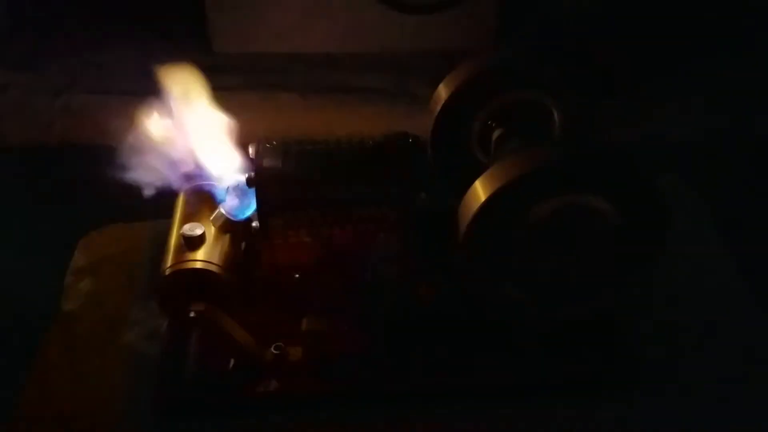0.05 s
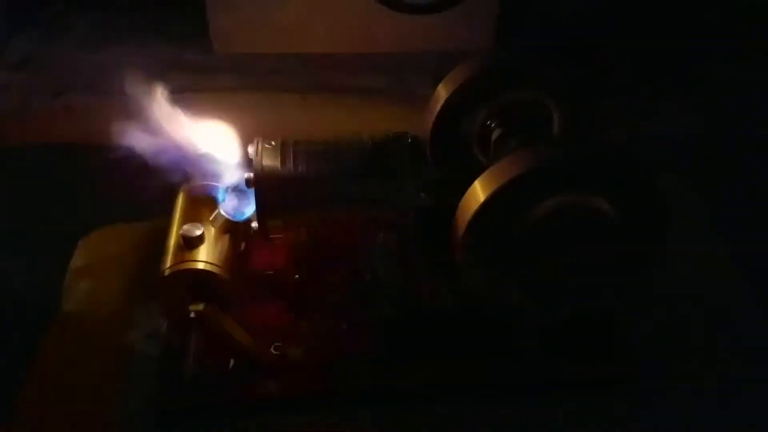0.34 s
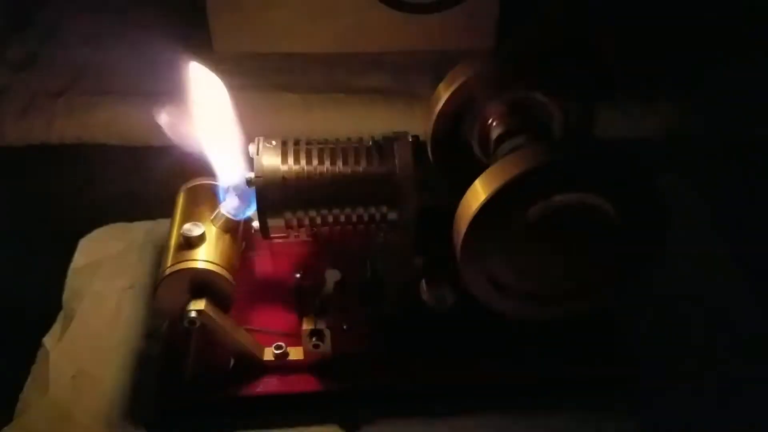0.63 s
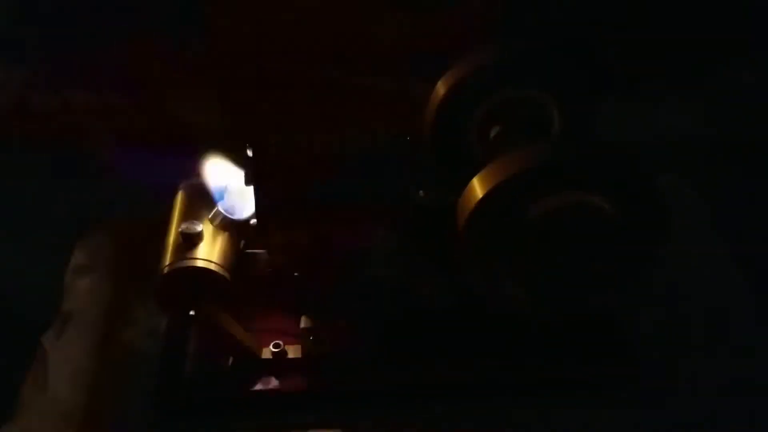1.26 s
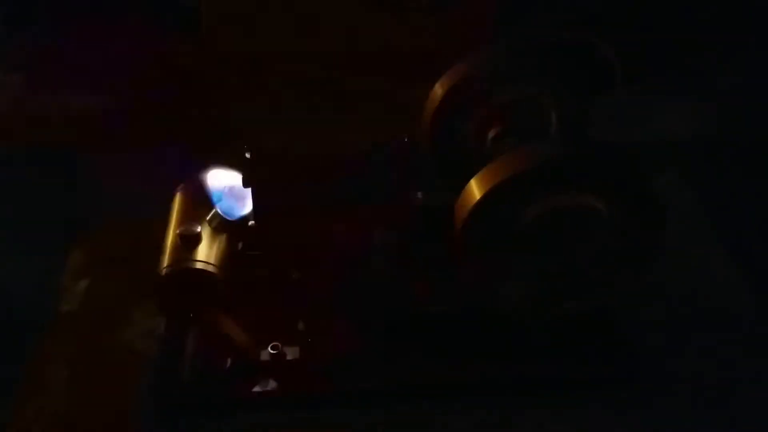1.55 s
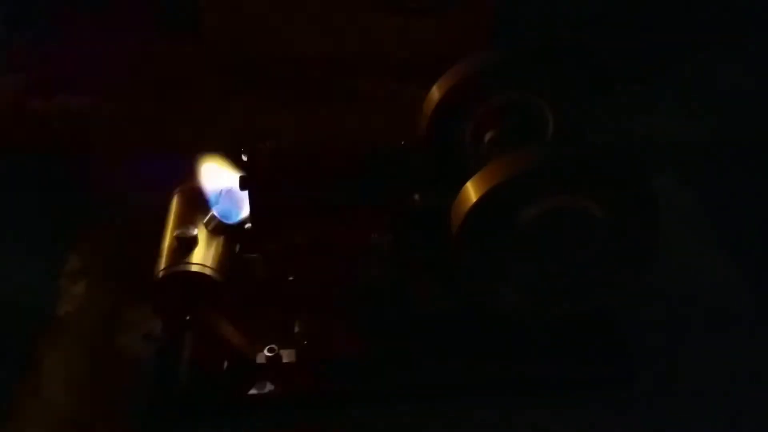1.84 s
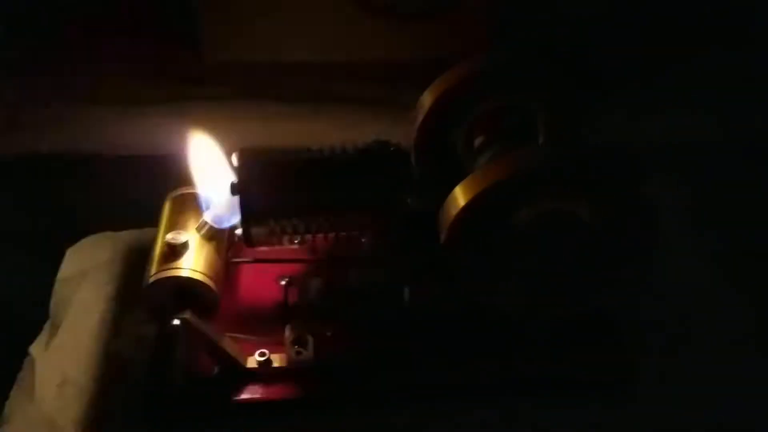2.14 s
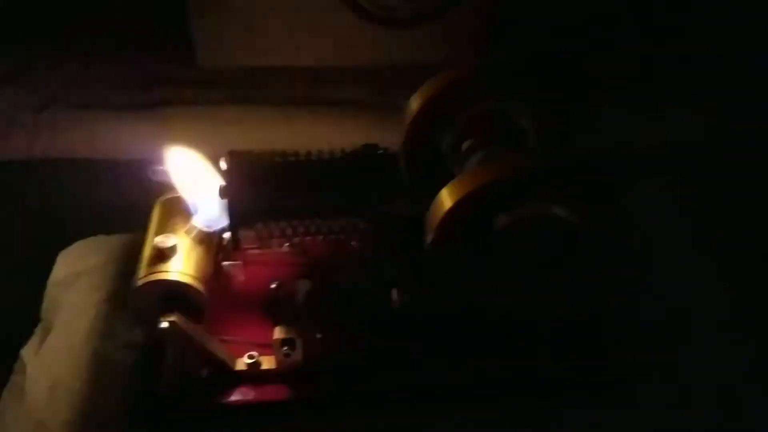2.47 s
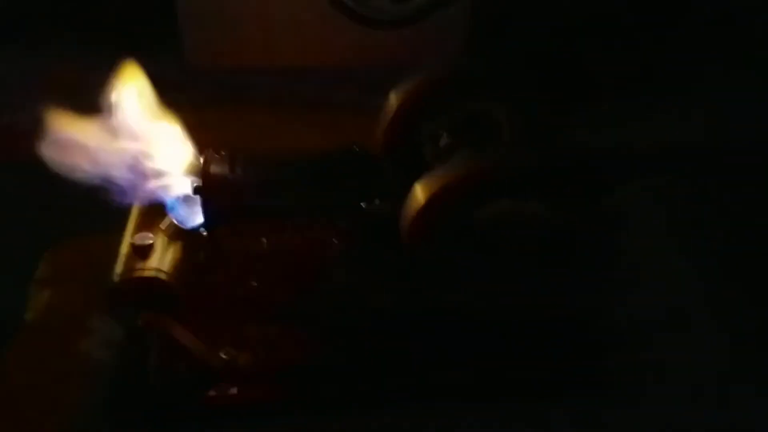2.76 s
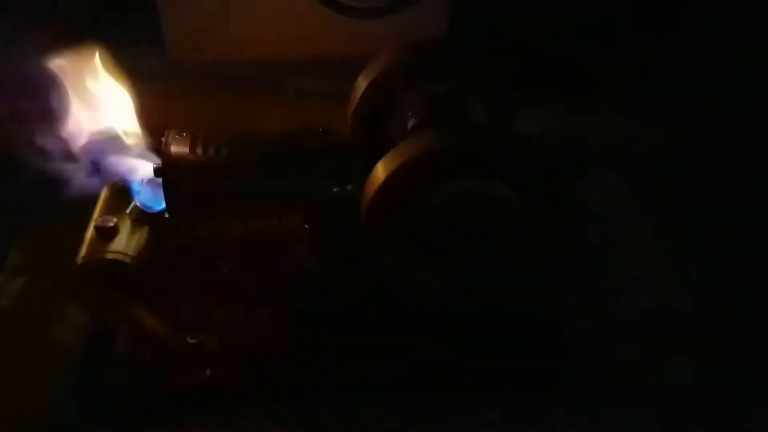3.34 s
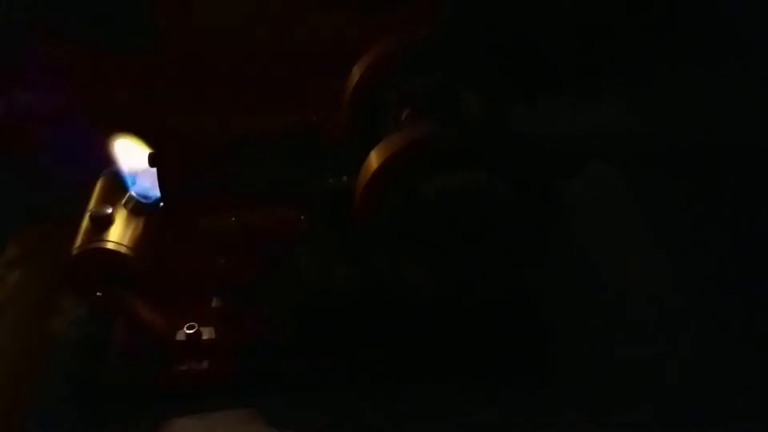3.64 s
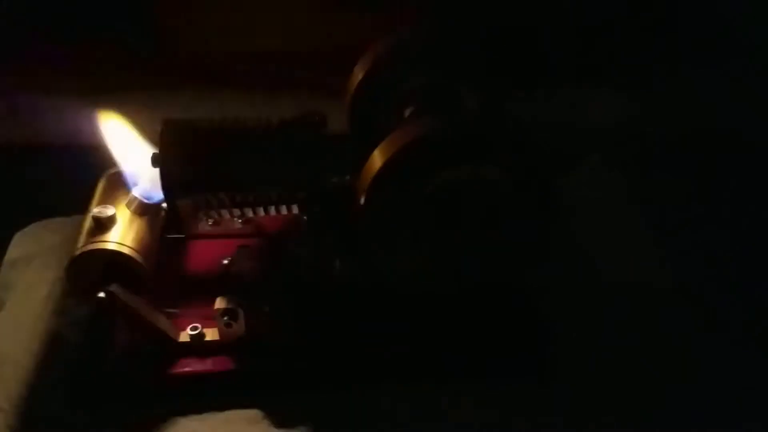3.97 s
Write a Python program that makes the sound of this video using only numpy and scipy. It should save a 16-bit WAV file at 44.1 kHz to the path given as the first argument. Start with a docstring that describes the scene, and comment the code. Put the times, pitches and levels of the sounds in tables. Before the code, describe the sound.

A small model engine runs from the start to about 4 seconds, at nearly four strokes a second. Each stroke is a tick, a pop and a sharp metallic clack with thin, high ringing, followed by a short whistling puff of gas. Tiny squeaks come near 0.4, 1.2, 2.8 and 3.6 seconds. A faint hum and steady noise lie underneath in a small, quiet room.

```python
"""A small flame-licker engine

The engine runs on a table in a quiet room, at nearly four turns a second. On each turn the valve
ticks, a pressure pulse pops from the port and the valve clacks shut, setting brass parts and springs
in free vibration. Gas then hoots in the resonant cylinder (on some turns only) and leaks out in a
whistle that falls with the pressure, while the linkage rubs, ticks and now and then squeaks."""
import sys
import numpy as np
from scipy import signal
from scipy.fft import rfft, irfft
from scipy.io import wavfile
from scipy.ndimage import uniform_filter1d, minimum_filter1d

SR = 44100
rng = np.random.default_rng(int(sys.argv[2]) if len(sys.argv) > 2 else 0)


def output_pcm(signal):
    """Save a mono or channel-first signal as 16-bit PCM at the path in sys.argv[1].

    Samples are clipped to [-1, 1] before scaling.
    """
    pcm = np.clip(np.atleast_2d(signal).T, -1, 1) * 32767
    wavfile.write(sys.argv[1], SR, np.round(pcm).astype(np.int16))


N = 176400
TIME = np.arange(N) / SR

# Working strokes. Each row: start in seconds, then relative levels in dB of the pop, the clatter,
# the brass ring, the spring zing and the valve clank.
STROKES = [(0.0138, -19, -21.5, -33.5, -27.5, -20), (0.2749, -24, -33, -53, -31.5, -57),
           (0.5864, -19, -26, -36.5, -27.5, -27), (0.8442, -19, -23.5, -35.5, -28.5, -18.5),
           (1.11, -18.5, -24.5, -34.5, -29.5, -19.5), (1.4016, -18, -25.0, -37.0, -28, -22.5),
           (1.6578, -20, -21, -33.5, -29.5, -23), (1.9366, -20, -25, -37.5, -33, -21),
           (2.1916, -18.5, -22, -36, -30, -19), (2.4302, -18, -21.5, -46.5, -28, -26),
           (2.6912, -18.5, -23, -40, -25, -28.3), (2.9814, -21.5, -21.5, -37.5, -21, -29.0),
           (3.233, -19, -23.5, -36.5, -27.5, -27), (3.4799, -22, -28, -42, -32.5, -33.5),
           (3.7679, -20, -27, -41, -31.5, -29)]
# Gas leaks. Each row: time of mid-fall in seconds, relative levels in dB of the high and low parts.
WHISTLES = [(0.12, -22, -21.5), (0.39, -21, -27), (0.691, -28.5, -19), (0.954, -22.5, -19),
            (1.223, -25.5, -22.5), (1.513, -23.5, -13.5), (1.773, -37, -17.5), (2.044, -18, -21),
            (2.296, -19.5, -26), (2.541, -23.0, -25), (2.803, -25, -26.5), (3.087, -27.5, -23.5),
            (3.336, -22.5, -15.5), (3.594, -18.5, -39), (3.886, -36, -23.5)]
# Squeaks of dry metal. Each row: time of the peak in seconds, frequency in Hz, level in dB.
SQUEAKS = [(.385, 7740, -30), (.415, 6480, -25), (1.247, 6600, -24.5), (1.796, 6546, -32),
           (2.528, 8441, -29), (2.796, 8010, -25.5), (2.829, 6546, -29), (3.585, 7860, -22)]
# Other brief events. Each row: time of the peak in seconds, relative level in dB.
HOOTS = [(0.076, -24.5), (0.3426, -24.5), (0.908, -24.5), (1.1748, -22.5), (1.7236, -22.5), (2.4931, -20.5),
         (2.7573, -19.5), (3.2936, -20.5), (3.5458, -21)]
RUBS = [(0.149, -35.5), (0.419, -35), (0.72, -36), (0.981, -34), (1.247, -36), (1.536, -37), (1.79, -33.5),
        (2.076, -35.5), (2.321, -33.5), (2.566, -33), (2.826, -35.0), (3.112, -34.5), (3.364, -34.5),
        (3.617, -34), (3.904, -37.7)]
TICKS = [(0.1535, -44), (0.2076, -34.5), (0.2533, -18.5), (0.4156, -33), (0.502, -40), (0.5623, -18),
         (0.7259, -28.5), (0.7786, -32), (0.8231, -23), (0.9849, -40), (1.0403, -33), (1.0869, -19),
         (1.2471, -51), (1.3224, -40.0), (1.3778, -21.5), (1.5405, -25.5), (1.5929, -31), (1.6364, -20.5),
         (1.7948, -28.7), (1.8646, -33), (1.9153, -20.5), (2.0788, -17), (2.1283, -28), (2.1704, -21.5),
         (2.3258, -18.5), (2.3711, -28), (2.4111, -22), (2.5687, -32), (2.6239, -34), (2.6701, -19.5),
         (2.8267, -44), (2.9023, -33), (2.9581, -22), (3.1172, -24), (3.1677, -27.5), (3.2117, -20.5),
         (3.3687, -24), (3.417, -32), (3.4599, -19), (3.6163, -46), (3.6923, -28), (3.7463, -19.5),
         (3.9135, -49), (3.9704, -28.5)]

# Normal modes. Each row: frequency in Hz, left and right gains in dB, time to decay 60 dB in seconds.
BRASS_MODES = [(4071, -2, 2, 0.98), (4121, 3.5, 7, 0.56), (4108, 5, 9.5, 0.26), (5400, -26, -25, 0.36),
               (6500, -8.5, -27, 0.3), (8430, 4, 4.5, .2), (8140, -2.5, -22.5, .22), (9500, -20, -25, .4)]
VALVE_MODES = [(4560, -3.5, 7.5, 0.0093), (4800, 0, 4.5, 0.024), (7500, -5, -15.5, 0.011),
               (2650, -12, -10.5, 0.049)]

# Noise spectra. Each row: frequency in Hz, relative level in dB.
BACKGROUND_SPECTRUM = [(25, -17.5), (50, 6.5), (75, 2.5), (130, -9.5), (300, -8.5), (500, -11.5),
                       (800, -4.5), (1500, -11.5), (2300, -15.5), (3200, -20), (4500, -16), (6500, -24),
                       (10000, -24.5)]
THUD_SPECTRUM = [(25, -16), (45, -4), (70, -4), (110, 1), (170, -3.5), (400, -14.5), (800, -9.5),
                 (1500, -16), (2300, -37), (4000, -52.5)]
CLATTER_SPECTRUM = [(500, -5), (1300, -3), (2200, -12.5), (3300, -12), (4200, 0), (4650, -5), (5300, -17),
                    (6300, -9), (7400, -0.5), (8400, 4.5), (9200, -22.5), (10000, 0.5)]
ZING_SPECTRUM = [(3000, -28), (4700, -43), (5050, -17), (5500, -20.5), (6200, -17.5), (6800, -21),
                 (7700, -21), (8150, -12), (8370, -1.5), (8700, -19), (9200, -14), (9900, 2.5)]
GULP_SPECTRUM = [(200, -7), (550, -13.5), (820, -7.5), (1100, -8.5), (1500, 3), (1900, -1.5), (2400, -4),
                 (3200, -27.5), (8000, -30)]
PUFF_SPECTRUM = [(100, -20.5), (400, 0), (800, 10.5), (1250, 0), (1700, -3), (2200, -28), (2800, -6.5),
                 (3500, -61), (6000, -12), (8000, -11.5), (10000, 2)]
RUB_SPECTRUM = [(600, -5), (1100, -4.5), (1900, 1.5), (2500, -11), (3500, -10), (5500, -10.5), (6600, -0.5),
                (7400, -7.5), (8400, -3), (10000, -1.5)]
KNOCK_SPECTRUM = [(25, -17.5), (50, -7), (75, 3.5), (115, 0.5), (170, -7), (400, -11), (700, -5),
                  (1500, -20.5), (3000, -32)]
TICK_SPECTRUM = [(300, -44.5), (1500, -10), (2700, -15), (4500, -13.5), (5600, -16.5), (6600, -2.5),
                 (7600, -11.5), (8800, -11.5), (10000, 10)]
ROOM_SPECTRUM = [(80, 2.5), (400, -2.5), (900, 3), (1700, 0.5), (3000, 1), (10000, -1)]

# Width of the sound field. Each row: frequency in Hz, correlation between left and right.
COHERENCE = [(60, 1), (250, 0.93), (600, 0.48), (1200, 0.53), (2500, 0.0099), (10000, 0.23)]
# Balance of the sound field. Each row: frequency in Hz, left minus right level in dB.
BALANCE = [(100, -0.5), (600, -1.5), (1300, -1), (2500, -3.5), (4700, 3.5), (7300, -1.5), (8500, 3.5),
           (10000, -1.5)]


def from_db(db):
    """Decibels to amplitude ratio."""
    return 10 ** (np.asarray(db) / 20)


def at_hz(points, hz):
    """Interpolation of a table on a logarithmic frequency axis."""
    f, value = np.transpose(points)
    return np.interp(np.log(hz + 1), np.log(f), value)


def noise(spectrum):
    """Coloured noise of rms 1; a shared and an opposed part make the two sides partly coherent."""
    hz = np.arange(N // 2 + 1) * SR / N
    mid, side = rfft(rng.standard_normal((2, N)))
    alike, sides = np.clip(at_hz(COHERENCE, hz), -.99, .99), np.array([[1], [-1]])
    gain = from_db(at_hz(spectrum, hz) + sides * at_hz(BALANCE, hz) / 2) * (hz > 20) * (hz < 11000)
    x = irfft(gain * (np.sqrt(1 + alike) * mid + np.sqrt(1 - alike) * side * sides), N)
    return x / x.std()


def drift(rate_hz):
    """Low-pass random fluctuation with standard deviation 1."""
    lowpass = signal.butter(2, rate_hz, fs=SR, output="sos")
    x = signal.sosfilt(lowpass, rng.standard_normal(N + SR))[SR:]
    return x / x.std()


def flicker(depth_db, rate_hz):
    """Random amplitude modulation, as a gain with rms 1."""
    gain = from_db(depth_db * drift(rate_hz))
    return gain / np.sqrt(np.mean(gain ** 2))


def swell(t, width_s):
    """Gaussian envelope around t = 0."""
    return np.exp(-np.minimum((t / width_s) ** 2 / 2, 60))


def strike(t, rise_s, fall_s):
    """Linear attack from t = 0, then the exponential decay of a damped vibration."""
    return np.clip(t / rise_s, 0, 1) * np.exp(-np.clip((t - rise_s) / fall_s, 0, 60))


def tone(hz, lead=0):
    """Sine whose phase is the integral of a pitch curve, the left side ahead by lead radians."""
    return np.sin(2 * np.pi * (np.cumsum(hz) / SR + rng.random()) + np.array([[lead], [0]]))


def play(rows, voice):
    """Superposition of voice(time since the event, other columns) over a table, in stereo."""
    out = np.zeros((2, N))
    for start, *columns in rows:
        span = slice(max(0, int((start - .06) * SR)), int((start + .7) * SR))
        out[:, span] += voice(TIME[span] - start, *columns)
    return out


def strokes(part):
    """Start and level of one part of every stroke."""
    column = 1 + ["pop", "clatter", "brass", "zing", "valve"].index(part)
    return np.array(STROKES)[:, [0, column]]


def background():
    """Flame and running gear give steady broadband noise, with a low wavering hum."""
    hum = from_db(-49) * tone(71.8 + 3 * drift(rate_hz=17.4))
    return from_db(-43) * noise(BACKGROUND_SPECTRUM) + hum


def pops(pulse_hz=447.6, left_lead_s=.00026):
    """The port radiates a pressure pulse of about one cycle, which shakes the damped table."""
    def pulse(t, db):
        t = t + left_lead_s * np.array([[.5], [-.5]])
        return -from_db(db + 9) * np.cos(2 * np.pi * pulse_hz * t) * swell(t, width_s=.00091)
    thud = play(strokes("pop"), lambda t, db: from_db(db - 9.5) * strike(t, rise_s=.0017, fall_s=.036))
    return play(strokes("pop"), pulse) + thud * noise(THUD_SPECTRUM)


def clatter():
    """Loose parts collide as the valve shuts; brief impacts have a broad spectrum."""
    def burst(t, db):
        return from_db(db + 8.5) * strike(t + .0006, rise_s=.0024, fall_s=.0054)
    return play(strokes("clatter"), burst) * noise(CLATTER_SPECTRUM)


def brass(detune_hz=2.8):
    """Struck brass rings in its normal modes, never quite alike; modes close in frequency beat."""
    def mode(t, db, hz, left_db, right_db, t60):
        gain = from_db(db + np.array([[left_db], [right_db]]) - rng.normal())
        envelope = strike(t, rise_s=.0062, fall_s=t60 / np.log(1000))
        return gain * envelope * tone(np.full(len(t), hz + detune_hz * rng.normal()), lead=1.39)
    return play(strokes("brass"), lambda t, db: sum(mode(t, db, *row) for row in BRASS_MODES))


def springs():
    """The high modes of the springs lie so densely that they zing as noise; each band flickers."""
    def burst(t, db):
        return from_db(db + 14) * strike(t - .00072, rise_s=.0018, fall_s=.032)
    hz, spectrum = np.arange(N // 2 + 1) * SR / N, rfft(noise(ZING_SPECTRUM))
    centres_hz = [5000, 6500, 7700, 8400, 9100, 9800]
    zing = 0
    for share in np.eye(len(centres_hz)):
        band = irfft(spectrum * np.interp(hz, centres_hz, share), N)
        zing += band * flicker(depth_db=3, rate_hz=35)
    chatter = flicker(depth_db=1, rate_hz=222)  # of loose metal
    return play(strokes("zing"), burst) * chatter * zing


def valve(detune=.0081):
    """The impact of the valve excites a few heavily damped modes, heard as a clank."""
    def mode(t, db, hz, left_db, right_db, t60):
        gain = from_db(db + np.array([[left_db], [right_db]]))
        envelope = strike(t - .0017, rise_s=.0014, fall_s=t60 / np.log(1000))
        pitch = np.full(len(t), hz * (1 + detune * rng.normal()))
        return gain * envelope * tone(pitch, lead=rng.normal(1, .37))
    return play(strokes("valve"), lambda t, db: sum(mode(t, db, *row) for row in VALVE_MODES))


def hoots(resonance_hz=815, glide_hz_per_s=1400, jitter_hz=44, width_s=.0029):
    """A gulp of gas excites the cavity resonance of the cylinder for a few cycles."""
    def hoot(t, db):
        glide = glide_hz_per_s * t * swell(t, 2 * width_s)
        hz = resonance_hz + glide + jitter_hz * drift(300)[:len(t)]
        return from_db(db + 7.5) * swell(t, width_s) * tone(hz)
    gulp = play(HOOTS, lambda t, db: from_db(db - 14) * strike(t + .007, rise_s=.007, fall_s=.0082))
    return play(HOOTS, hoot) * from_db([[-1.1], [1.1]]) + gulp * noise(GULP_SPECTRUM)


def whistles(high_hz=1522, low_hz=1137, jitter_hz=44.7, fall_s=.0072, step_s=.0086, width_s=.0049):
    """Gas leaks past the valve in a puff, with a rough flow tone whose pitch falls with the pressure."""
    jitter = jitter_hz * drift(250)
    flutter = 1 + .14 * np.array([drift(120), drift(180)])
    def whistle(t, high_db, low_db):
        waver = np.roll(jitter, rng.integers(N))[:len(t)]
        hz = low_hz + (high_hz - low_hz) * (1 - np.tanh(t / fall_s)) / 2
        high = from_db(high_db) * swell(t + step_s, width_s)
        low = from_db(low_db) * swell(t - step_s, width_s)
        falling = (high + low) * tone(hz + waver, lead=1.47)
        arch = swell(t + step_s / 2, width_s=.014)  # a faint upper tone rises and falls
        arch_hz = 2846 * (.85 + .19 * arch)
        return falling + from_db(-46.5) * arch * tone(arch_hz + waver, lead=1.9)
    puff = play(WHISTLES, lambda t, *_: from_db(-30) * swell(t - .0057, width_s=.016))
    return from_db([[.9], [-1.9]]) * flutter * play(WHISTLES, whistle) + puff * noise(PUFF_SPECTRUM)


def rubs():
    """Sliding friction in the linkage makes a rasping noise, each time with a dull knock of the rods."""
    rub = play(RUBS, lambda t, db: from_db(db + 3.5) * swell(t, width_s=.008))
    knock = play(RUBS, lambda t, _: from_db(-30) * swell(t, width_s=.0074))
    chatter = flicker(depth_db=1, rate_hz=222)
    return rub * chatter * noise(RUB_SPECTRUM) + knock * noise(KNOCK_SPECTRUM)


def ticks(rise_s=.0012):
    """Short, hard contacts of cam and valve radiate bright bursts of noise."""
    bursts = play(TICKS, lambda t, db: from_db(db + 8.5) * strike(t + rise_s, rise_s, fall_s=.0024))
    return bursts * noise(TICK_SPECTRUM)


def squeaks(glide_hz_per_s=-9000, jitter_hz=130):
    """Friction between dry metal parts excites a brief, unsteady high tone."""
    def squeak(t, centre_hz, db):
        hz = centre_hz + glide_hz_per_s * t + jitter_hz * drift(400)[:len(t)]
        return from_db(db) * swell(t, width_s=.0042) * tone(hz, lead=1.4)
    return play(SQUEAKS, squeak)


def room(x, t60=.39):
    """Diffuse reflections in a small furnished room: convolution with exponentially decaying noise."""
    decay = strike(TIME, rise_s=.0013, fall_s=t60 / np.log(1000))
    response = (noise(ROOM_SPECTRUM) * decay)[:, :SR // 2]
    response /= np.sqrt((response ** 2).sum() / 2)
    return from_db(-14) * signal.fftconvolve(x, response, axes=1)[:, :N]


def compressor(x, threshold_db=-10, share=.16, ahead_s=.042, release_db_per_s=127.5):
    """Just ahead of a loud peak the gain drops by a share of the excess level, then recovers steadily."""
    excess_db = np.maximum(20 * np.log10(abs(x).max(0) + 1e-9) - threshold_db, 0)
    ahead = int(ahead_s * SR)
    wanted_db = -minimum_filter1d(-share * excess_db, ahead, origin=-(ahead // 2))
    recovery = release_db_per_s * TIME
    cut_db = np.maximum.accumulate(wanted_db + recovery) - recovery
    return x * from_db(-uniform_filter1d(cut_db, size=160))


def scene():
    """The direct sound of the engine, its reverberation and the background add by superposition."""
    impacts = pops() + clatter() + brass() + springs() + valve()
    gas = hoots() + whistles()
    linkage = rubs() + ticks() + squeaks()
    engine = impacts + gas + linkage
    return engine + room(engine) + background()


def record(dry, stopband_hz=10550):
    """Compression softens the peaks, and a steep low-pass filter removes the highest treble."""
    lowpass = signal.cheby2(14, 62, stopband_hz, fs=SR, output="sos")
    return signal.sosfilt(lowpass, compressor(dry))


dry = scene()
out = record(dry)
output_pcm(out)
```